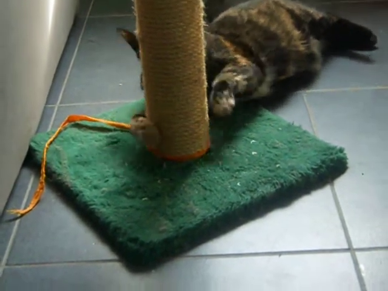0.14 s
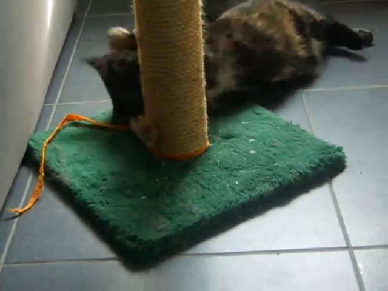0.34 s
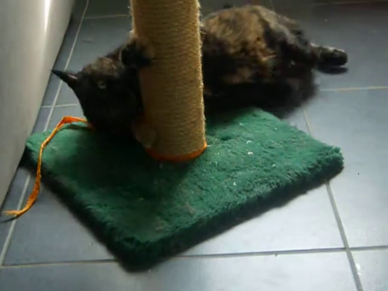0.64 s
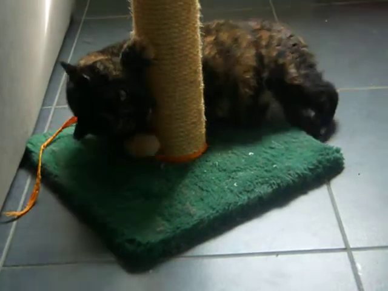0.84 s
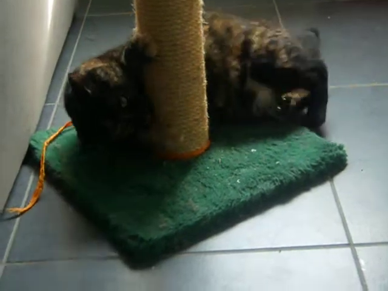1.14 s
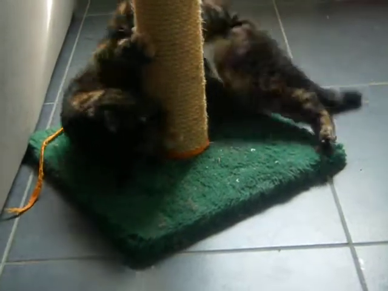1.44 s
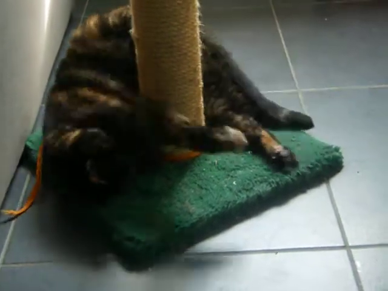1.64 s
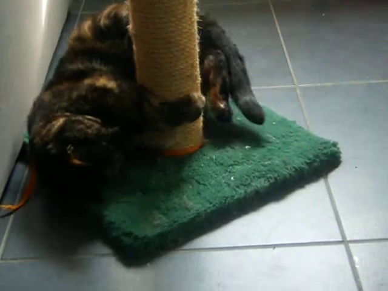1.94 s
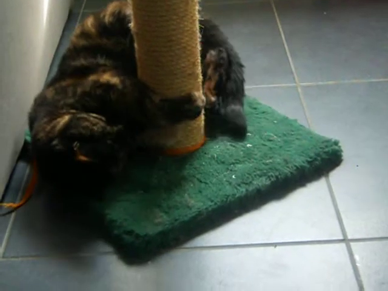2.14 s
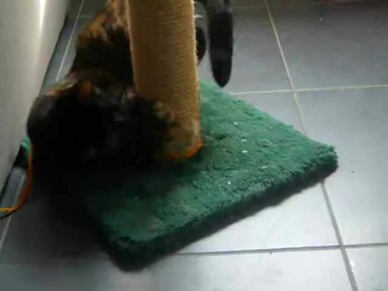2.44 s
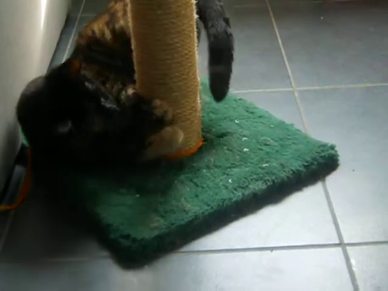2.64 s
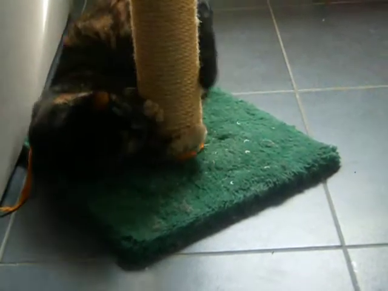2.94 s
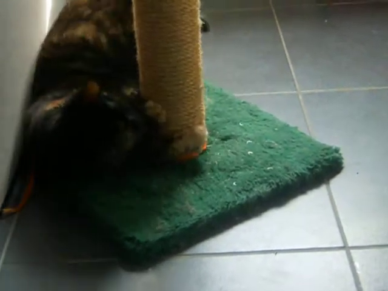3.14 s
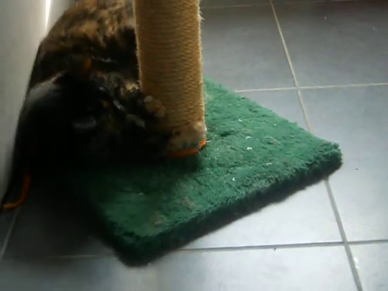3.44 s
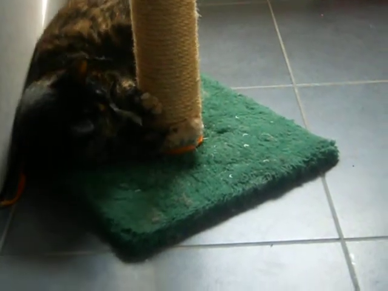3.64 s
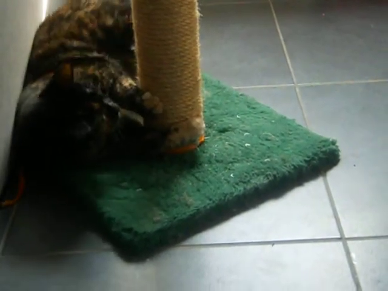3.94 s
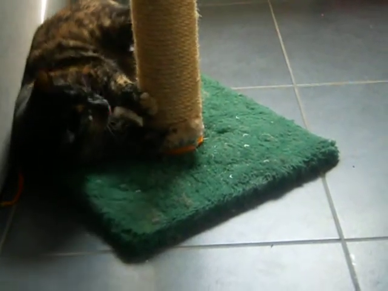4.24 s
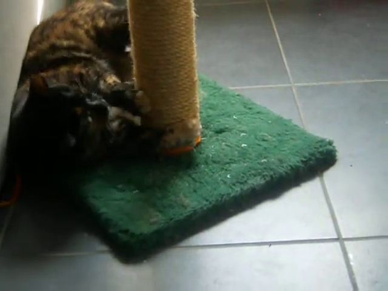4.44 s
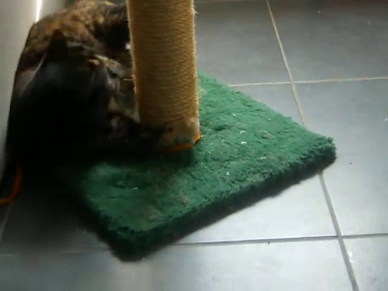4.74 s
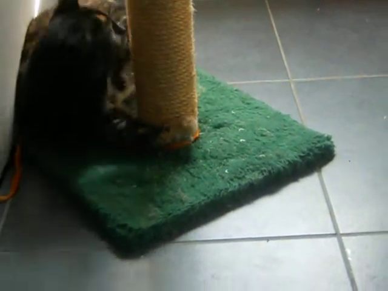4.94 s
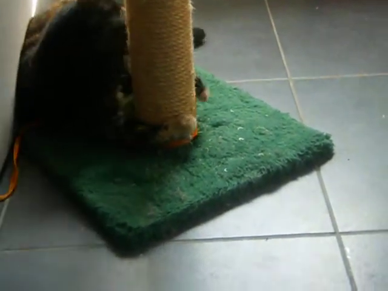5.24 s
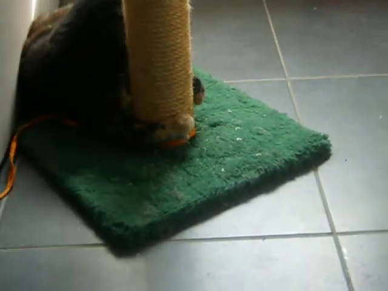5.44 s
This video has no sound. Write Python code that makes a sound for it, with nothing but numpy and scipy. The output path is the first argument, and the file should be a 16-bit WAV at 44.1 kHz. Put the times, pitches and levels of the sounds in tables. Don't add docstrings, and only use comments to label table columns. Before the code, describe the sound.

Dry, uneven clicks and brief scratchy rasps of claws on a rope-wrapped hollow post, in a hard tiled room with constant hiss.

```python
import sys
import numpy as np
from scipy import signal
from scipy.fft import rfft, irfft, next_fast_len
from scipy.io import wavfile

SR = 44100
rng = np.random.default_rng(int(sys.argv[2]) if len(sys.argv) > 2 else 0)


def wav_out(sig):
    wavfile.write(sys.argv[1], SR, np.round(np.clip(np.atleast_2d(sig).T, -1, 1) * 32767).astype(np.int16))


def natural_amplitude(level_db):
    exponent = np.asarray(level_db, float) / 20
    return 10 ** exponent


N = 246078
MIC_RATE = 16000

# (frequency [Hz], level [dB], t60 [s])
TUBE = [(330, -6, 0.08), (607, -4.5, 0.042), (666, -2.5, 0.024), (934, 3, 0.044), (1214, 0, 0.03),
        (1538, -7.5, 0.075)]


def band(x, low_hz, high_hz):
    return signal.sosfilt(signal.butter(2, [low_hz, high_hz], "band", fs=SR, output="sos"), x)


def rms_one(x):
    return x / np.sqrt(np.mean(x ** 2) + 1e-20)


def resonate(x, hz, width_hz):
    radius = np.exp(-np.pi * width_hz / SR)
    angle = 2 * np.pi * hz / SR
    return signal.lfilter([.5, 0, -.5], [1, -2 * radius * np.cos(angle), radius ** 2], x + 1e-18)


def convolve(x, response):
    size = next_fast_len(N + len(response))
    return irfft(rfft(x, size) * rfft(response, size), size)[:N]


def snaps(tear_s, after, spread, travel_s, strand_width_hz, ring_db, knock_db, knock_lag_s):
    # (time [s], peak [dB], strand pitch [Hz], brightness [dB], tube knock [dB])
    tears = [(0.1665, -27, 4430, -7, -28), (0.3718, -18.5, 4270, 1, -22), (0.4104, -14, 2950, -2.5, -22),
             (0.7507, -24, 3700, -4.5, -21), (0.7558, -30, 3900, -4, -9.5), (0.7815, -21, 3960, 1, -36),
             (0.8674, -29, 3900, 3, -9), (0.8962, -13.5, 4250, -2, -40), (1.2052, -11, 4300, 1.5, -18),
             (1.2936, -22, 3140, 0.5, -13.5), (1.4379, -8, 4120, 0.5, -27.5), (1.4504, -24, 3920, 3, -25),
             (1.4731, -17, 4430, -6, -25), (1.4834, -21.5, 4230, 0, -16.5), (2.144, -31, 4200, -7, -17),
             (2.8446, -11.5, 4200, -1.5, -20.5), (2.8515, -23, 4200, 6, -20), (3.027, -18, 3630, -3, -21),
             (4.1395, -30.5, 3420, -1.5, -25), (4.3968, -23.5, 3050, 5, -28),
             (4.782, -14.5, 3100, -2.5, -21), (4.9997, -22, 3770, -7, -27), (5.1898, -26.5, 3560, -13, -10)]
    # (time [s], peak [dB])
    fibres = [(0.156, -31), (0.394, -39), (0.4236, -21.5), (0.906, -31), (0.92, -36), (0.9322, -31),
              (0.95, -29.5), (1.221, -34), (1.8624, -34), (2.8702, -41), (3.0106, -27), (5.2044, -38)]
    # (frequency [Hz], width [Hz])
    sheath_and_crack = [(2550, 800), (6100, 1350)]
    (low_hz, low_width), (crack_hz, crack_width) = sheath_and_crack
    fibre_hz, fibre_bright_db, fibre_knock_db = 4250, 1.5, -17.5
    rows = tears + [(s, db, fibre_hz, fibre_bright_db, fibre_knock_db) for s, db in fibres]
    thin = signal.butter(2, 1700, "high", fs=SR, output="sos")
    bending = [[spread ** 2, -2 * spread, 1, 1, -2 * spread, spread ** 2]] * 6
    out, push = np.zeros(N), np.zeros(N)
    luck_rows = rng.uniform(0, 1, (len(rows), 26))
    for (s, peak_db, hz, bright_db, tube_db), luck in zip(rows, luck_rows):
        at = int((s + travel_s) * SR)
        clicks = np.zeros(SR // 50)
        when = luck[:12]
        strength = after * (2 * luck[12:24] - 1) * np.exp(-1.5 * when)
        np.add.at(clicks, (when * tear_s * SR).astype(int), strength)
        clicks[0] = 1
        clicks = signal.sosfilt(bending, clicks)
        tick = natural_amplitude(ring_db) * resonate(clicks, hz, strand_width_hz)
        sheath = resonate(clicks, low_hz * (0.88 + 0.17 * luck[24]), low_width)
        tick -= natural_amplitude(-15 + 0.65 * bright_db) * sheath
        crack = resonate(clicks, crack_hz * (1.11 + 0.036 * luck[25]), crack_width)
        tick -= natural_amplitude(-9.5 + bright_db) * crack
        out[at:at + len(tick)] += natural_amplitude(peak_db + 6.5) * signal.sosfilt(thin, tick)
        push[at + int(knock_lag_s * SR)] = natural_amplitude(peak_db + tube_db + knock_db)
    for hz, db, t60 in TUBE:
        out += natural_amplitude(db) * resonate(push, hz, np.log(1000) / np.pi / t60)
    return out


def pings():
    # (time [s], peak [dB], pitch [Hz])
    flicks = [(0.372, -30.5, 4240), (0.375, -40, 2600), (0.385, -41, 4300), (0.4115, -37, 2800),
              (0.4143, -34.5, 2550), (0.4255, -42, 2900), (0.8985, -34, 2570), (1.208, -36.5, 1880),
              (0.9332, -35, 2850), (0.95, -41, 2900), (1.439, -27, 4200), (1.468, -30.5, 2500),
              (1.4728, -29.5, 2550), (1.4836, -26, 2480), (1.5188, -39, 2600), (2.143, -40, 4200),
              (2.852, -28.5, 4020), (2.8554, -39, 2350), (3.028, -31, 3470), (4.7829, -34, 3000),
              (4.398, -37, 2900), (5.0005, -41, 3650), (5.1915, -41, 3550), (5.206, -38, 3500),
              (5.225, -41, 3100)]
    width_hz = 570
    click = np.zeros(SR // 50)
    click[0] = np.e * np.pi * width_hz / SR * 2
    out = np.zeros(N)
    for s, db, hz in flicks:
        at = int(s * SR)
        ring = resonate(resonate(click, hz, width_hz), hz, width_hz)
        out[at:at + len(click)] += natural_amplitude(db) * ring
    return out


def drags(per_s, spread_db, rise):
    # (start [s], length [s], crackle [dB], brightest [Hz], dull rub [dB])
    strokes = [(0.14, 0.094, -56.5, 4360, -60), (0.377, 0.04, -52, 4200, -50), (0.75, 0.13, -62, 3620, -67),
               (0.855, 0.068, -61, 3500, -56), (0.891, 0.097, -54.5, 3640, -56),
               (1.213, 0.012, -45.5, 6300, -54), (1.219, 0.051, -54, 4000, -47.5),
               (1.281, 0.063, -59, 4000, -50.5), (1.419, 0.048, -51.5, 3000, -53),
               (1.453, 0.018, -44, 5500, -48), (1.47, 0.03, -36.5, 6200, -54),
               (1.446, 0.07, -48, 4070, -57.5), (1.836, 0.18, -62, 3000, -57),
               (2.152, 0.05, -66, 2470, -50.5), (2.186, 0.13, -53.5, 3900, -53),
               (2.344, 0.15, -59.5, 3500, -56), (2.44, 0.086, -64, 3000, -72),
               (2.855, 0.12, -63, 2600, -57), (2.848, 0.036, -51, 4200, -45),
               (3.034, 0.018, -55, 3600, -75), (4.132, 0.029, -61, 2600, -53.5),
               (4.402, 0.023, -53.5, 3200, -54), (4.783, 0.027, -55, 3330, -52),
               (5.18, 0.072, -58, 3270, -66)]
    # (start [s], length [s], level [dB])
    slides = [
        (0.437, 0.02, -64),
        (1.462, 0.043, -54),
        (1.491, 0.045, -57.5),
        (1.535, 0.074, -63.5),
    ]
    # (frequency [Hz], width [Hz], level [dB])
    stroke_colour = [(2600, 5400, -4), (4200, 4400, -4.5), (6460, 810, -13.5)]
    slide_hz, slide_width_hz, slide_rub_db = 2580, 330, -66
    slips = natural_amplitude(spread_db * np.minimum(rng.exponential(1, N), 5)) * rng.choice([-1, 1], N)
    slips = rms_one(slips * (rng.random(N) < per_s / SR))
    shared = np.zeros(N)
    for k, (hz, width_hz, db) in enumerate(stroke_colour):
        sign = (-1) ** k
        shared += sign * natural_amplitude(db) * np.sqrt(width_hz) * resonate(slips, hz, width_hz) / 40
    dull = rms_one(sum(natural_amplitude(db) * resonate(slips, hz, 180) for hz, db, t60 in TUBE))
    rows = [(s, length_s, db, hz, 0.46 * hz, rub_db) for s, length_s, db, hz, rub_db in strokes]
    rows += [(s, length_s, db, slide_hz, slide_width_hz, slide_rub_db) for s, length_s, db in slides]
    out = np.zeros(N)
    for s, length_s, crackle_db, hz, width_hz, rub_db in rows:
        part = slice(int(s * SR), int((s + length_s) * SR))
        phase = np.linspace(0, 1, part.stop - part.start)
        stroke = np.sin(np.pi * phase ** rise)
        bright = resonate(slips[part], hz, width_hz) + shared[part]
        out[part] += stroke * (natural_amplitude(crackle_db) * bright + natural_amplitude(rub_db) * dull[part])
    return out


def room(x, build_s):
    # (delay [s], level [dB])
    reflections = [(.00045, -21.5), (.0011, -23.5), (.0019, -18), (.0027, -18)]
    # (low edge [Hz], high edge [Hz], t60 [s], level [dB])
    tail_bands = [(295, 1320, 0.26, -14.5), (1200, 3900, 0.38, -16.5), (3000, 6400, 0.51, -18.5),
                  (5060, 7560, .32, -14)]
    t = np.arange(SR // 2) / SR
    response = np.zeros(len(t))
    white = rng.standard_normal((len(tail_bands), len(t)))
    for noise, (low_hz, high_hz, t60, db) in zip(white, tail_bands):
        shape = natural_amplitude(-60 * t / t60) * (1 - np.exp(-(t / build_s) ** 2))
        shape *= 4 / np.sqrt(np.sum(shape ** 2))
        response += natural_amplitude(db) * band(noise, low_hz, high_hz) * shape
    for s, db in reflections:
        response[int(s * SR)] += natural_amplitude(db)
    return convolve(x, response)


def hiss():
    # (frequency [Hz], density [dB per Hz])
    hiss_colour = [(12, -26.5), (20, 1), (53, -3), (602, -4), (1290, -6.5), (5930, -12), (7600, -13.5),
                   (9880, -27.5)]
    points_hz, points_db = np.transpose(hiss_colour)
    hz = np.maximum(np.fft.rfftfreq(N, 1 / SR), 1)
    colour = natural_amplitude(np.interp(np.log(hz), np.log(points_hz), points_db))
    colour = colour * (hz > 8) * (hz < MIC_RATE / 2)
    noise = irfft(rfft(rng.standard_normal(N)) * colour, N)
    return natural_amplitude(-48) * rms_one(noise)


def scene():
    post = snaps(tear_s=.005, after=0.68, spread=0.671, travel_s=.0001, strand_width_hz=860,
                 ring_db=-12, knock_db=-9.5, knock_lag_s=0.002116)
    post = post + pings() + drags(per_s=6000, spread_db=3.5, rise=0.43)
    post = signal.sosfilt(signal.butter(2, 7000, fs=SR, output="sos"), post)
    return np.tile(post + room(post, build_s=0.0036) + hiss(), (2, 1))


def low_pass(x):
    return signal.sosfilt(signal.butter(12, 9060, fs=SR, output="sos"), x)


def record(dry):
    # (frequency [Hz], level [dB])
    whine = [(7656, -78), (7714, -81)]
    t = np.arange(N) / SR
    steep = signal.cheby2(14, 60, 9420, fs=SR, output="sos")
    x = .32 * np.tanh(dry / .32)
    x = signal.sosfilt(signal.cheby1(6, 1, 7440, fs=SR, output="sos"), x)
    for hz, db in whine:
        x = x + natural_amplitude(db) * np.sqrt(2) * np.sin(2 * np.pi * hz * t)
    x = signal.sosfilt(steep, x)
    x = x + natural_amplitude(-1) * 2 * x * np.cos(2 * np.pi * MIC_RATE * t)
    x = signal.sosfilt(signal.butter(13, 7940, fs=SR, output="sos"), x)
    mix = signal.sosfilt(steep, x)
    return low_pass(mix)


dry = scene()
out = record(dry)
wav_out(out)
```